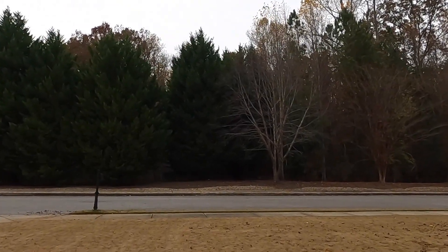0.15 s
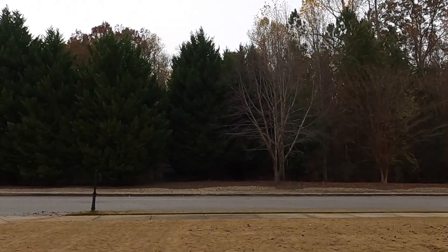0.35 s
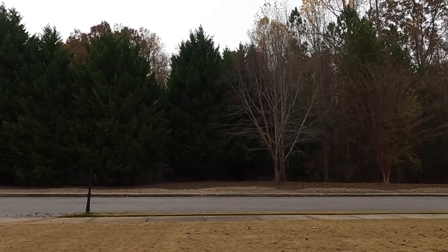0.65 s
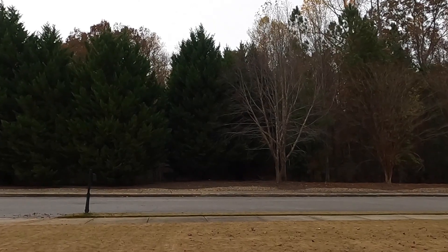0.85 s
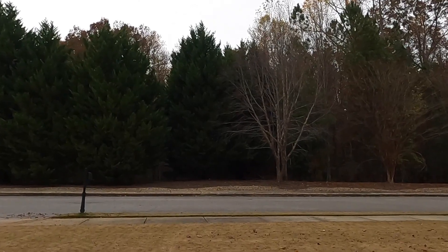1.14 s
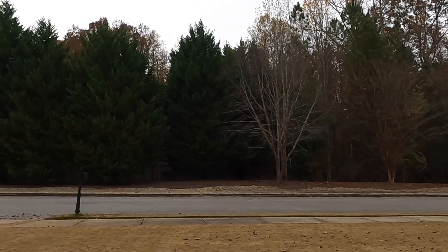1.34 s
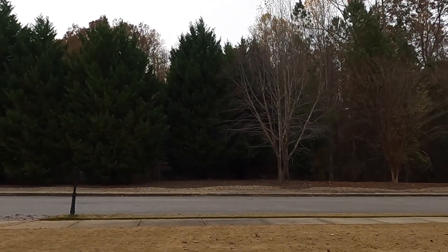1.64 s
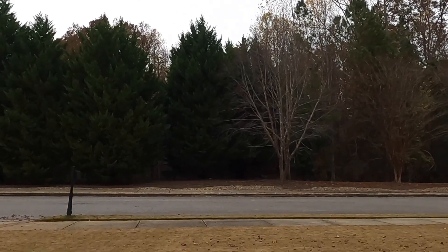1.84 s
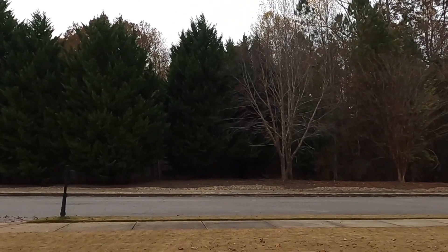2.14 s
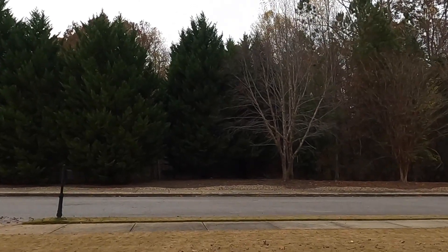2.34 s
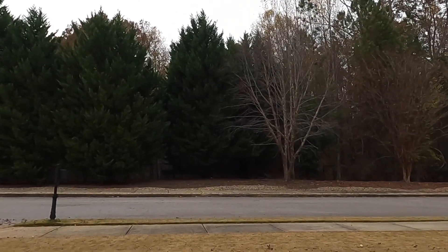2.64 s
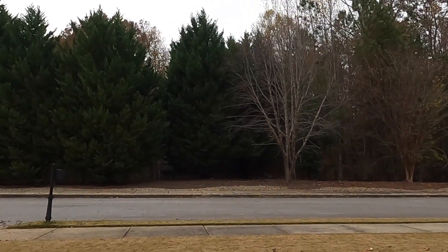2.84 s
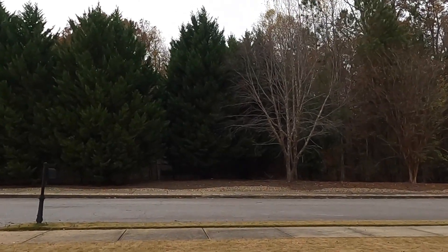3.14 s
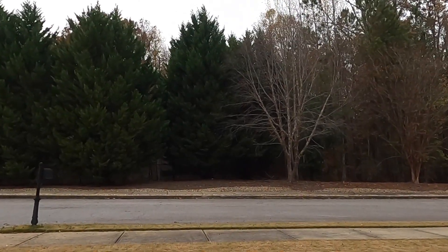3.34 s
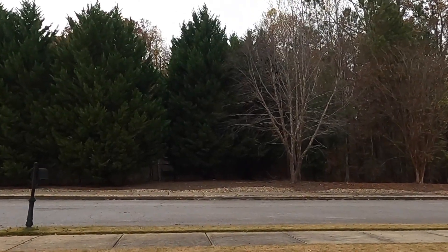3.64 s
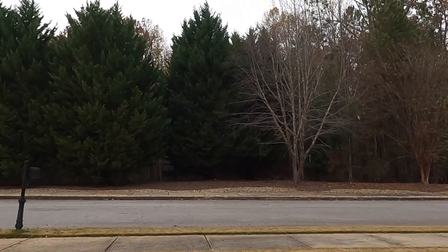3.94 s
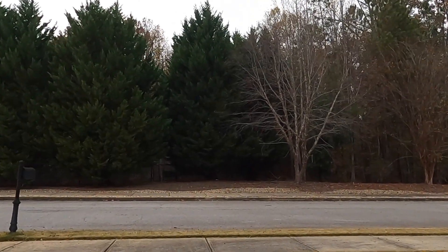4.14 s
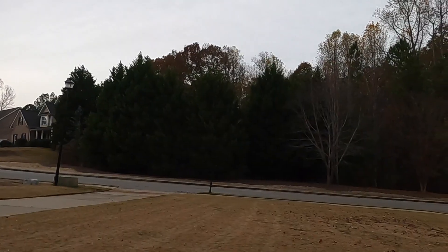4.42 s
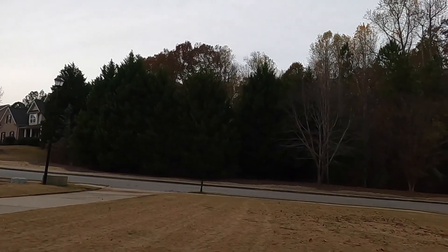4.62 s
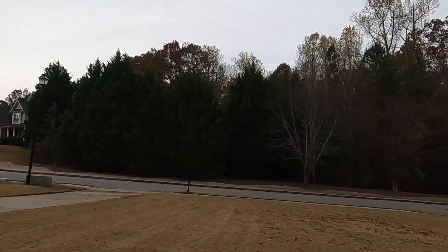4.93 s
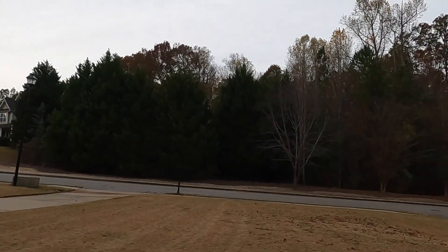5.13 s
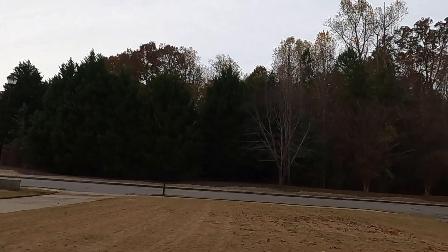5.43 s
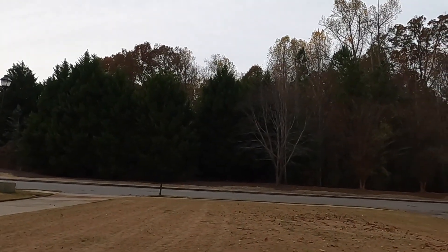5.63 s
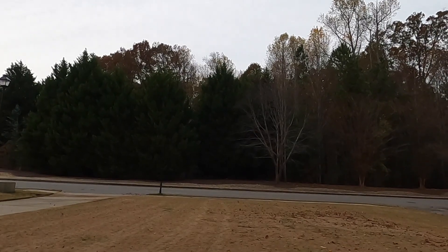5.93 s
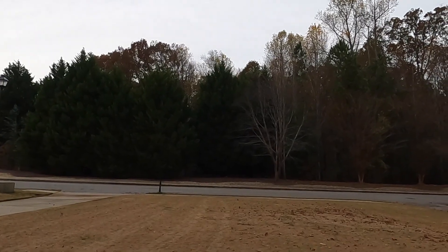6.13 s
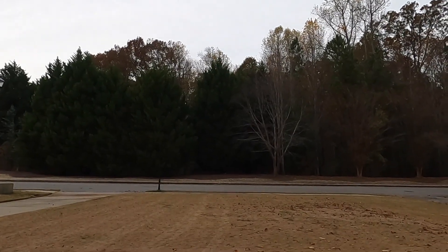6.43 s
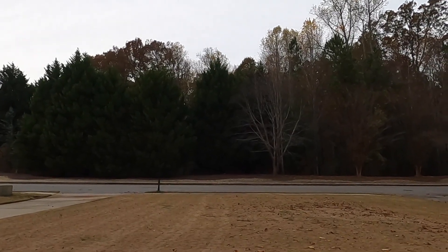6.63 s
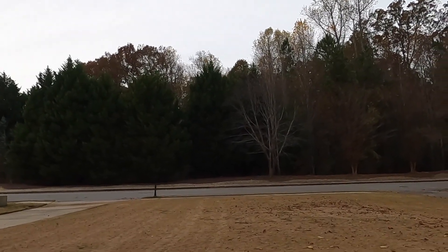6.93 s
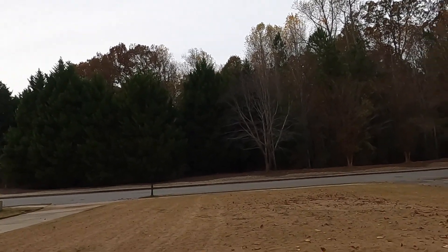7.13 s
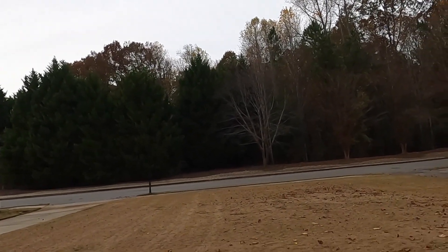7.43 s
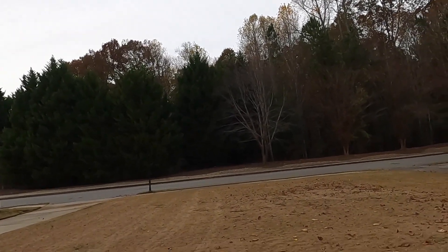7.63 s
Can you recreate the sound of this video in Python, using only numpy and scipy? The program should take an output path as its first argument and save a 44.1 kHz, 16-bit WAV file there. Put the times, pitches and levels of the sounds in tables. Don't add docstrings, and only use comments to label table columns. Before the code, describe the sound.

A low, throbbing electric mower drone fills the whole stretch, heard from the grass in the open with one microphone. Turbulent air rushes under the deck, with a faint fluttering high whine. Struck leaves give short crunches and dull knocks, busiest before four seconds. After a tiny click at the midway cut, the same machine resumes at once with a changed hum; it turns its chute, the upper roar grows brighter, and fewer leaves crackle until the sudden end.

```python
import sys
import numpy as np
from scipy import signal
from scipy.fft import rfft, irfft, next_fast_len
from scipy.io import wavfile

SR = 44100
rng = np.random.default_rng(int(sys.argv[2]) if len(sys.argv) > 2 else 0)


def to_wav(sig):
    pcm = np.clip(np.atleast_2d(sig), -1, 1) * 32767
    pcm = np.round(pcm).astype(np.int16)
    wavfile.write(sys.argv[1], SR, pcm.T)


def convert_level_to_amplitude(level_db):
    exponent = np.asarray(level_db, float) / 20
    return 10 ** exponent


N = 342656
PADDED = next_fast_len(N)
CUT_S = 4.24405


def rms_one(x):
    return x / np.sqrt(np.mean(x ** 2) + 1e-20)


def in_time(rows):
    seconds, *columns = np.transpose(rows)
    return [np.interp(np.arange(N) / SR, seconds, column) for column in columns]


def across_cut(before, after):
    return np.where(np.arange(N) / SR < CUT_S, before, after)


def turned():
    turn_s, turn_length_s = 5.4, 0.95
    return np.clip((np.arange(N) / SR - turn_s) / turn_length_s + .5, 0, 1)


def drift(rate):
    pole = np.exp(-80 * np.pi * rate / SR)
    noise = rng.standard_normal(N // 40 + 2002)
    slow = signal.lfilter([1], [1, -2 * pole, pole * pole], noise)[2000:]
    return np.interp(np.arange(N) / 40, np.arange(len(slow)), rms_one(slow))


def octaves():
    return np.log2(np.arange(PADDED // 2 + 1) * SR / PADDED + 1)


def coloured(points):
    # (frequency [Hz], level [dB])
    microphone = [(3700, -0.5), (4850, -2.5), (5400, -10.5), (6200, -11), (8600, -20.5), (9500, -20),
                  (11500, -35), (13000, -42.5), (15500, -60)]
    colour_db = 0
    for curve in (points, microphone):
        hz, db = np.transpose(curve)
        colour_db = colour_db + np.interp(octaves(), np.log2(hz), db)
    return convert_level_to_amplitude(colour_db) * rfft(rng.standard_normal(PADDED))


def partial(turns, multiple, level_db, wander):
    return np.sqrt(2) * convert_level_to_amplitude(level_db) * np.cos(2 * np.pi * multiple * turns + wander)


def blades(turns, blade_turns, near_db):
    # (left [dB], middle [dB], right [dB])
    blade_db = [
        [(-26, -33, -21.5), (-21.6, -30.5, -18.4), (-24, -25.5, -30), (-34, -34.5, -33), (-48.3, -41.5, -39),
         (-37, -45, -42.5)],
        [(-45, -19.5, -36.5), (-19.5, -22, -25.5), (-23.5, -28, -33.5), (-25, -50, -31), (-41.8, -52, -63),
         (-48.5, -46, -57)],
    ]
    path_cycles = [
        [(-0.008, -0.02, -0.027), (0.14, -0.31, 0.34), (-0.11, 0.19, 0.059), (0.3, 0.33, 0.31),
         (0.06, 0.46, 0.13), (0.086, 0.21, -0.14)],
        [(-0.047, -0.0057, -0.032), (0.26, 0.2, -0.29), (-0.0024, -0.22, -0.14), (0.06, 0.051, 0.08),
         (-0.027, -0.26, 0.19), (-0.051, -0.29, 0.29)],
    ]
    # (level [dB], row of swell_follows)
    upper = [(-37, 0), (-35, 0), (-37.5, 1), (-39, 1), (-45.5, 1), (-61, 1), (-46.5, 1)]
    # (share of nearness, gained in the turn [dB])
    swell_follows = [(1.5, -16), (1.5, 1)]
    out = np.zeros(N)
    for k in range(len(blade_db[0])):
        for b, own_turns in enumerate(blade_turns):
            level_db = across_cut(blade_db[0][k][b], blade_db[1][k][b])
            path = across_cut(path_cycles[0][k][b], path_cycles[1][k][b])
            out += partial(own_turns, k + 1, level_db, 2 * np.pi * path)
    swell_db = [share * near_db + gain_db * turned() for share, gain_db in swell_follows]
    for k, (level_db, row) in enumerate(upper, start=5):
        wavering_db = level_db + swell_db[round(row)] + 0.53 * drift(1.5)
        out += partial(turns, k, wavering_db, 1.2 * drift(0.47))
    return out


def motors(blade_turns, effort_db):
    multiples = (20, 25, 35)
    # (level [dB], share of motor effort)
    whine = [(-41.5, 0.94), (-52, 0.26), (-54.5, .2)]
    out = np.zeros(N)
    for k, (level_db, share) in zip(multiples, whine):
        swell_db = level_db + share * (effort_db - effort_db.mean())
        out += partial(blade_turns[0], k, swell_db + 1.8 * drift(11.0), 1.3 * drift(5.2))
        out += partial(blade_turns[1], k, swell_db - 1.4 + 1.1 * drift(17.0), 0.78 * drift(3.8))
    return out


def deck_air(turns, ranges_db, patchy_db, chop):
    # (frequency [Hz], density [dB per Hz])
    rush = [(35, -42), (60, -40), (80, -19), (135, -9), (200, 2.5), (265, -4.5), (380, -0.5), (480, 1),
            (900, -6.5), (1150, -16.5), (1600, -16), (2200, -15.5), (2700, -20), (3700, -29.5)]
    spectrum, axis, gust = coloured(rush), octaves(), drift(12.0)
    out = np.zeros(N)
    for centre in np.arange(4.5, 14.5, .5):
        band = np.cos(np.pi * np.clip(axis - centre, -.5, .5)) ** 2
        place = np.interp(centre, [9.5, 10, 10.5, 12, 13], np.arange(5))
        shares = np.clip(1 - abs(place - np.arange(5)), 0, 1)
        leaf_gust = 1.1 * shares[-1] * gust * convert_level_to_amplitude(.8 * ranges_db[-1])
        flicker_db = patchy_db * (drift(6.0) + leaf_gust)
        out += convert_level_to_amplitude(shares @ ranges_db + flicker_db) * irfft(spectrum * band, PADDED)[:N]
    return rms_one(out) * (1 + chop * np.cos(2 * np.pi * turns))


def leaves(turns, leaf_db):
    # (time [s], peak [dB])
    big = [(.3591, -37), (.6828, -35.5), (.981, -39), (1.1443, -38), (1.6821, -37.5), (1.8532, -33),
           (1.8866, -31.5), (1.9629, -29), (2.0103, -34), (2.1211, -43), (2.2233, -34), (2.3047, -39),
           (2.3401, -31), (2.7287, -31), (2.8908, -40), (3.0215, -31.5), (3.1158, -49), (3.1567, -27.5),
           (3.3633, -35), (3.4276, -33.5), (3.461, -38), (3.489, -35), (3.5309, -35), (4.1739, -34),
           (4.8224, -35), (4.8863, -34), (5.014, -35), (5.6136, -33), (6.5161, -31.5), (6.9032, -41)]
    # (frequency [Hz], density [dB per Hz])
    crunch = [(3500, -19.5), (5000, -1), (6000, -2), (9000, 0), (12000, 2.5)]
    # (frequency [Hz], density [dB per Hz])
    body = [(1500, -32), (2600, -5.5), (3600, 3), (4600, -8.5), (6000, -25)]
    scraps, scrap_db, spread_db = 45, -39.5, -2.5
    t60_s, rise_s = .07, 0.0055
    when = (rng.random(scraps) * (N - 1)).astype(int) + 1
    size = rng.standard_normal(scraps)
    small = np.c_[when / SR, scrap_db + spread_db * size + .5 * leaf_db[when - 1]]
    envelopes = np.zeros((2, N))
    for strike_s, peak_db in np.r_[big, small]:
        i = max(int((strike_s - .002) * SR), 0)
        t = np.arange(min(N - i, SR // 5)) / SR
        again = 1 - .5 * np.cos(2 * np.pi * (turns[i:i + len(t)] - turns[i]))
        burst = again * convert_level_to_amplitude(-60 * t / t60_s) * np.minimum(t / rise_s, 1)
        knock_db = -32.5 + .6 * (peak_db - scrap_db)
        envelopes[:, i:i + len(t)] += burst * convert_level_to_amplitude(np.array([[peak_db], [knock_db]]))
    out = np.zeros(N)
    for envelope, colour in zip(envelopes, (crunch, body)):
        out += envelope * rms_one(irfft(coloured(colour), PADDED)[:N])
    return out


def cut_click():
    t = np.arange(N) / SR - CUT_S
    jump = (t > 0) * convert_level_to_amplitude(-18.5) * np.exp(-abs(t) / .0001)
    dip = convert_level_to_amplitude(-17) * np.exp(-(t / .0018) ** 2)
    return signal.sosfilt(signal.butter(6, 16500, fs=SR, output="sos"), jump - dip)


def scene():
    # (time [s], nearness [dB], leaves under the deck [dB], motor effort [dB])
    course = [(0, -2.5, -2, 1.5), (.6, -3, -2.5, -5), (1.2, -3, -1.5, -1), (1.6, -2.5, -1, -6.5),
              (1.9, -1, 1, -2), (2.3, 0.5, 5, -1), (2.6, .5, 1, 3), (3.3, 2.5, 1.5, -2.5), (3.6, .5, 2, -2),
              (4.1, 0, -1.5, 2.5), (4.5, .5, 0.5, 1), (4.8, 2, -0.5, 4), (5.4, 1, -1, 5.5),
              (6, 1.5, -0.5, 6), (6.4, 0, -1, 0), (7.1, 1, .5, 4), (7.5, 0, 2, -2.5), (7.77, 1, 0.5, -5.5)]
    # (time [s], left [passes], middle [passes], right [passes])
    leads = [
        [(0, -0.29, -0.071, -0.25), (.593, -0.32, -0.2, -0.35), (1.083, -0.29, -0.22, -0.22),
         (1.683, -0.36, -.587, -0.24), (2.135, -.376, -0.71, -0.17), (2.637, -0.5, -0.71, 0.00014),
         (2.96, -0.73, -1.11, -0.052), (3.728, -0.69, -1.11, 0.11), (4.24, -0.79, -1.26, .1)],
        [(4.24, 0.14, 0.48, 0.27), (4.95, 0.073, .642, 0.23), (5.07, -0.036, .665, .32),
         (5.523, -0.12, .65, 0.16), (6.096, -0.028, 0.92, 0.17), (6.876, 0.02, 1.25, 0.27),
         (7.213, 0.043, 1.37, 0.36), (7.77, 0.031, 1.653, .423)],
    ]
    # (share of nearness, share of leaves, gained in the turn [dB], gained as the scene changes [dB])
    air_follows = [(0.55, .1, -0.5, -0.2), (.7, .1, 4, -0.0084), (0.77, .1, 1.3, -1.5),
                   (.8, 0.18, -0.3, 2.2), (.1, .9, 0.2, .6)]
    pass_hz = 114.4
    near_db, leaf_db, effort_db = in_time(course)
    turns = pass_hz * np.arange(N) / SR
    blade_turns = turns + across_cut(*map(in_time, leads))
    hum = blades(turns, blade_turns, near_db) + motors(blade_turns, effort_db)
    ranges_db = np.array(air_follows) @ [near_db, leaf_db, turned(), across_cut(0, 1)]
    air = convert_level_to_amplitude(-19) * deck_air(turns, ranges_db, patchy_db=1.06, chop=.07)
    return (hum + air + convert_level_to_amplitude(-5) * leaves(turns, leaf_db) + cut_click())[None]


def roll_off(x):
    return signal.sosfilt(signal.butter(12, 15970, fs=SR, output="sos"), x)


def record(dry):
    fade = np.minimum(np.arange(1, N + 1) / SR / .0002, 1)
    mix = 1.294 * np.tanh(fade * fade[::-1] * dry / 1.31)
    return roll_off(mix)


dry = scene()
out = record(dry)
to_wav(out)
```